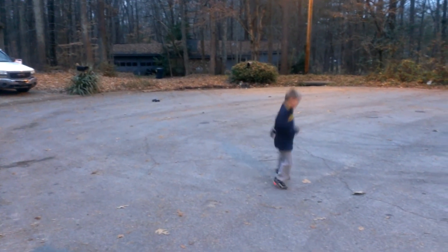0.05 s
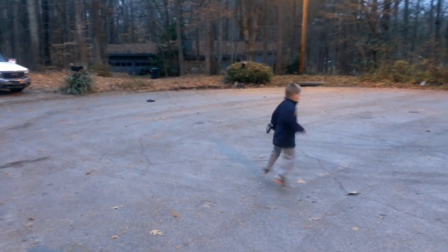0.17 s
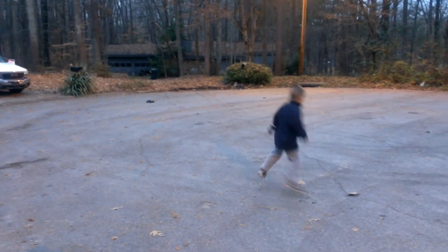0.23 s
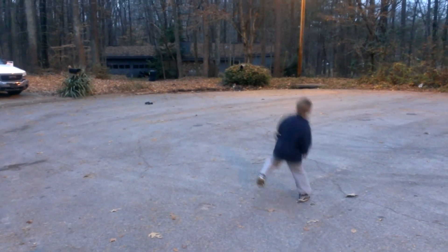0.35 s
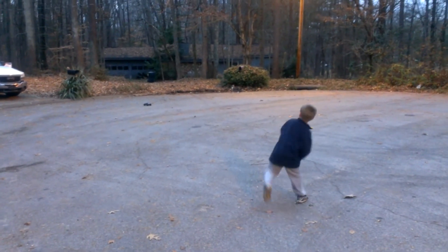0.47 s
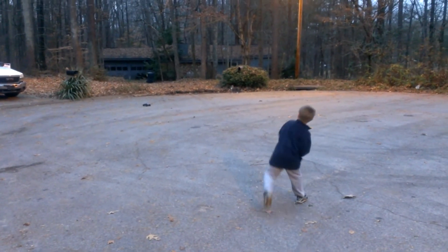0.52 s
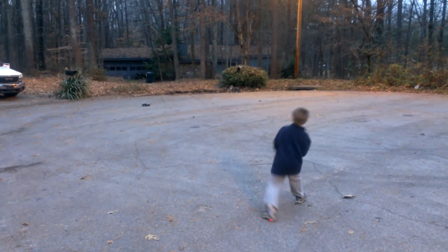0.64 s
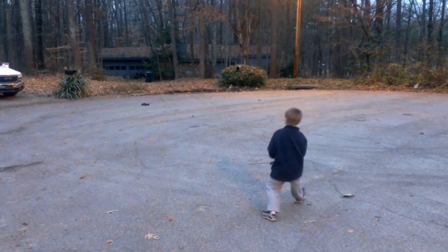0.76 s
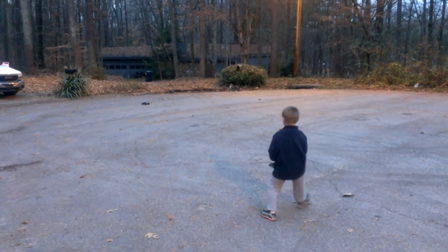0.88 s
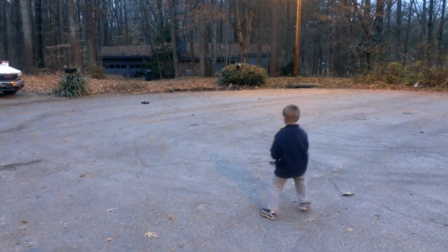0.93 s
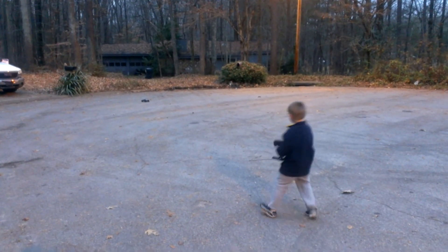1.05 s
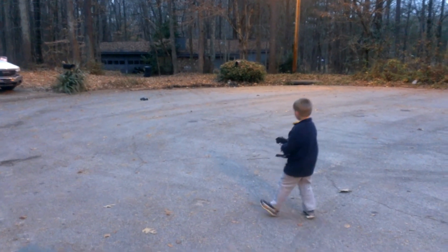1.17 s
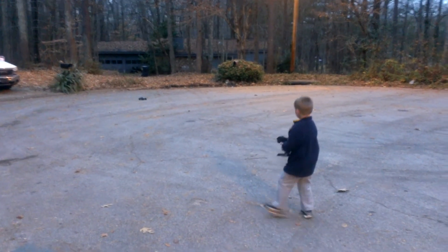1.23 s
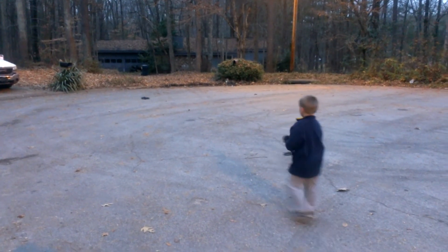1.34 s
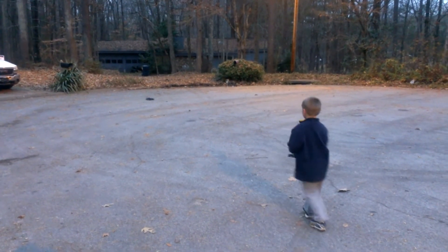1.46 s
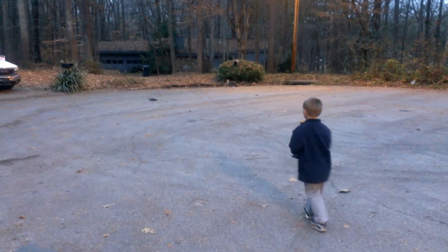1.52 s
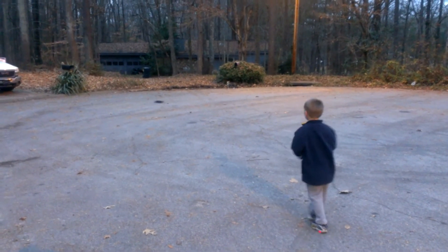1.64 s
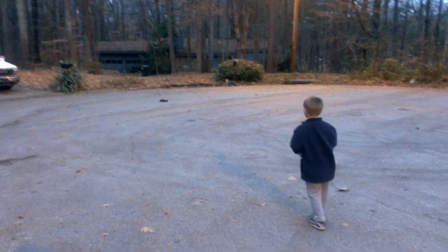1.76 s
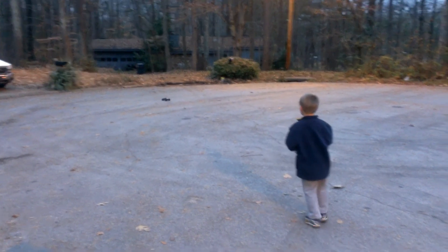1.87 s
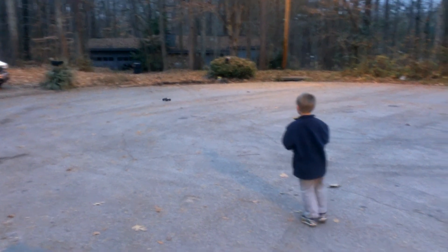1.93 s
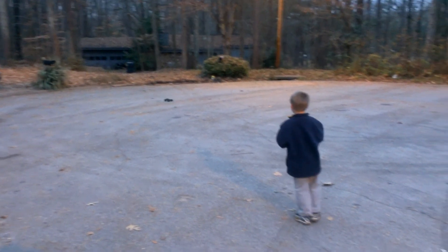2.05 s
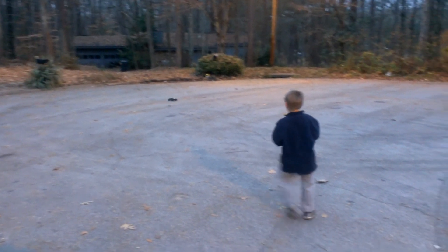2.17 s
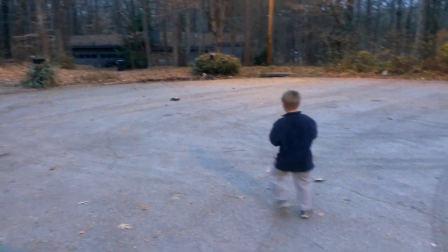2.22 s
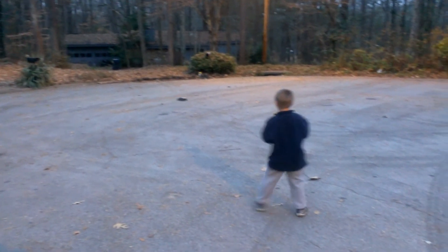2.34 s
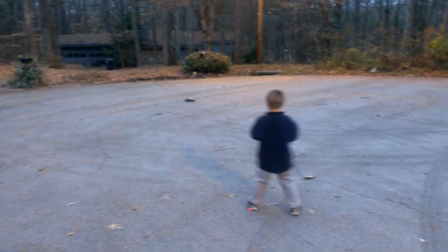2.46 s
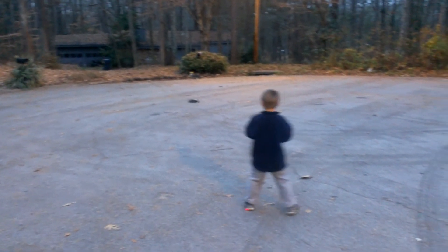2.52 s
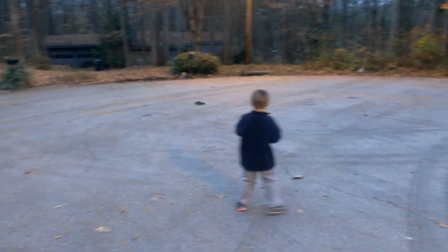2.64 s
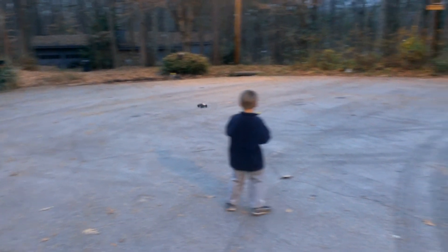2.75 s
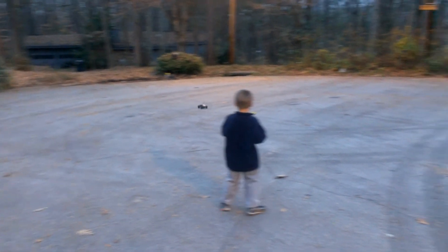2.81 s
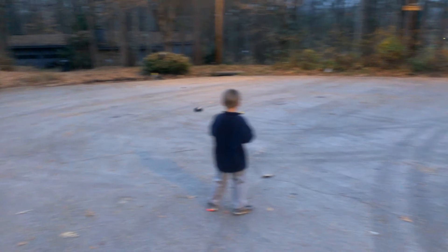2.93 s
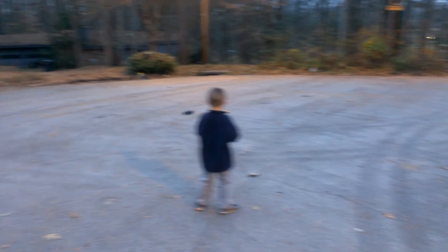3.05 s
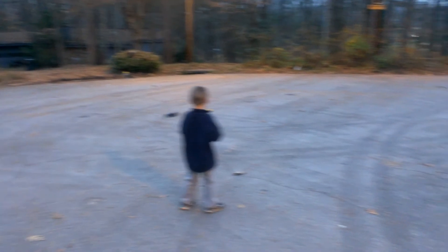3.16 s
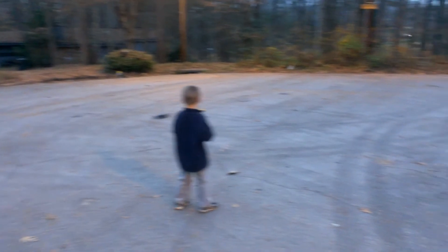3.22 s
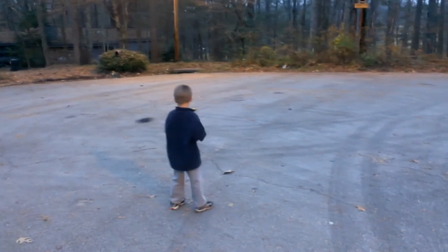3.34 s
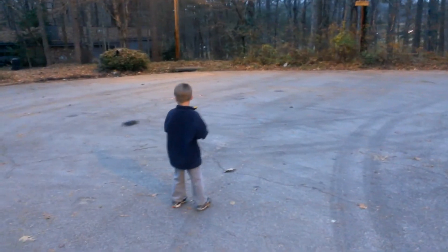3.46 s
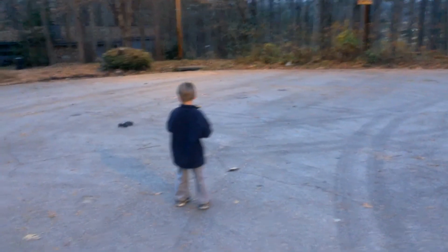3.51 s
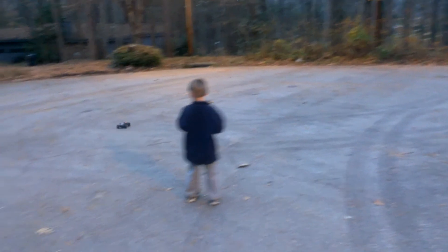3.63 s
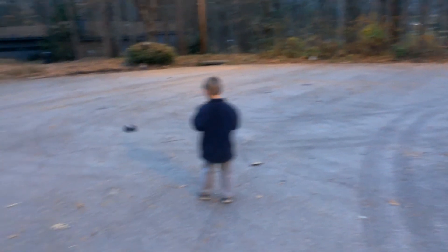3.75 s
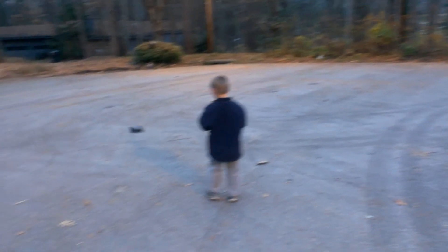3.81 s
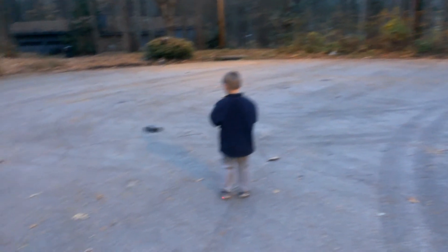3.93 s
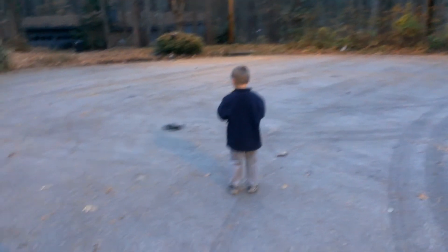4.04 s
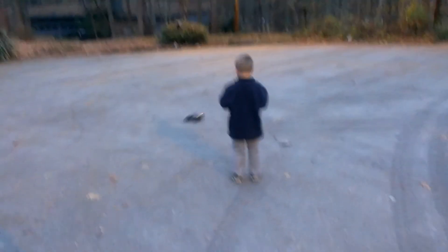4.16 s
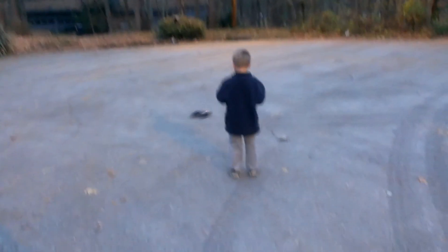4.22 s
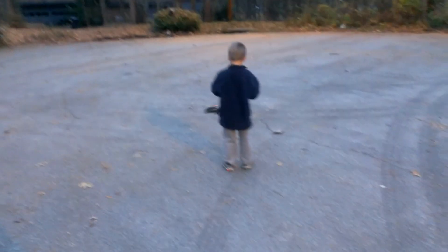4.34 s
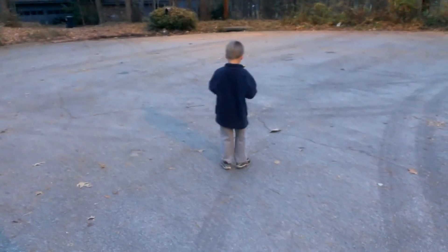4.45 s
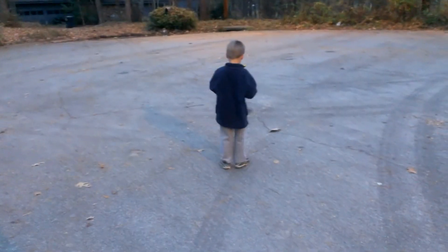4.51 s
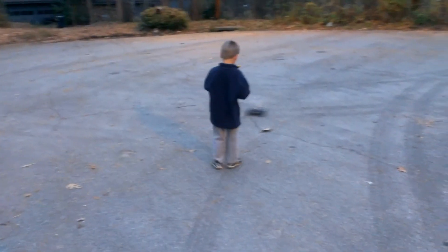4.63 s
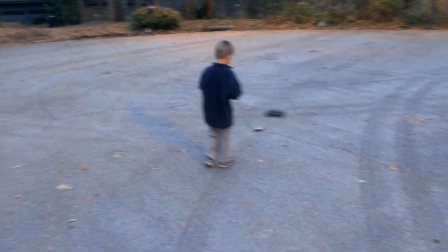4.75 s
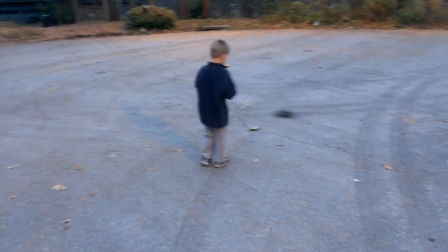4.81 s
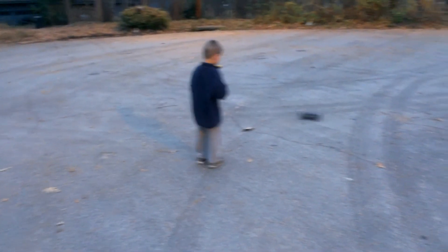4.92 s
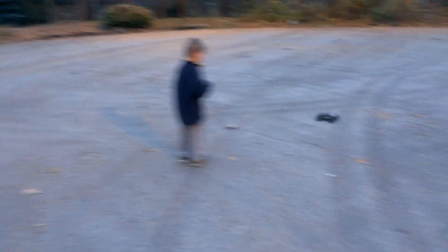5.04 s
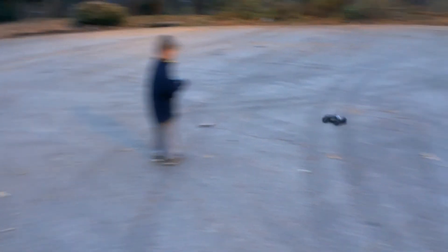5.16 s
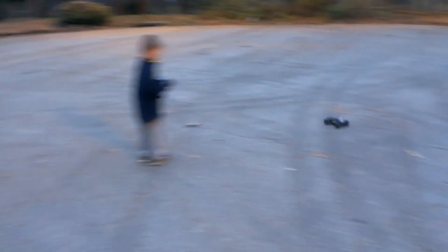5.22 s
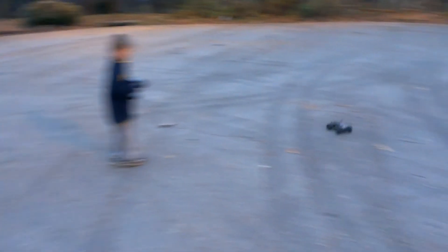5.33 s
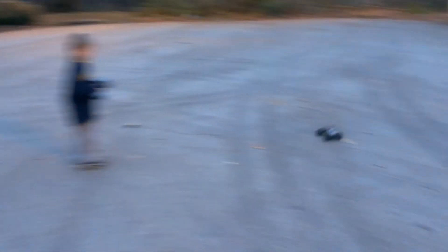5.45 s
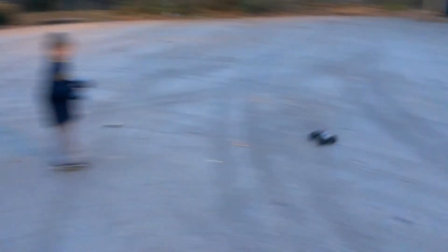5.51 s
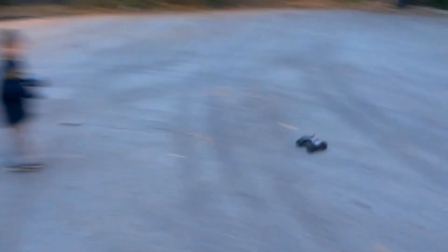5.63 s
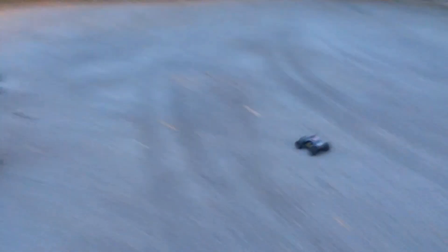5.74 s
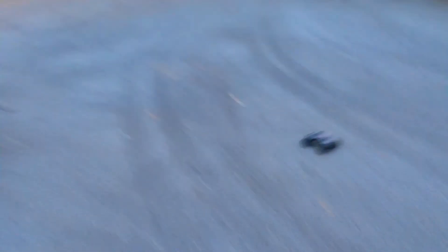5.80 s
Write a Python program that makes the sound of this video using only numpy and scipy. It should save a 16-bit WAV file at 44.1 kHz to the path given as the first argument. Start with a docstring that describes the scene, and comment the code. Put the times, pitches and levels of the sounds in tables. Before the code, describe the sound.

Quick gritty footsteps and a jacket rustle give way to an electric toy truck's buzzing gears and rolling chatter, swelling as it approaches.

```python
"""A small electric toy truck starts far off on asphalt, curves round and comes close. The grinding of its motor
and tyres is shaken noise, coloured by the resonances of its plastic shell; its gears whine as blurred tones. A
child's shoes scuff nearby (noise scrapes over dull thuds, and a knock and a crack ring like ticks), a jacket-
like rustle is narrow grainy noise, and grit ticks with short rings. Distant traffic murmurs as shaped noise; a
low hum of wavering pitch swells as the truck comes near."""
import sys
import numpy as np
from scipy import signal
from scipy.fft import rfft, irfft, next_fast_len
from scipy.io import wavfile
from scipy.ndimage import uniform_filter1d, map_coordinates

SR = 44100
rng = np.random.default_rng(int(sys.argv[2]) if len(sys.argv) > 2 else 0)


def transcribe(signal):
    """Save signal, clipped to [-1, 1], as a 16-bit WAV file at the path in sys.argv[1]."""
    frames = np.atleast_2d(signal).T
    limited = np.clip(frames, -1, 1)
    pcm = np.round(limited * 32767).astype(np.int16)
    wavfile.write(sys.argv[1], SR, pcm)


N = 259308
FRAME, HOP = 512, 128  # short-time spectra: frame length and step [samples]

# How loud the truck is before its jolts: (time [s], level [dB])
TRUCK_LEVEL = [(1.12, -57), (1.4, -55.5), (1.75, -52.5), (1.98, -47.5), (2.13, -42.5), (2.55, -36),
               (2.8, -31.5), (2.95, -35), (3.2, -37), (3.3, -40), (3.42, -38.5), (3.65, -33), (3.95, -35),
               (4.19, -35), (4.29, -41), (4.38, -49.5), (4.5, -43.5), (4.7, -38.5), (4.98, -33),
               (5.45, -32.5), (5.67, -30), (5.88, -28)]
# How much sooner the truck reaches the left ear than the right: (time [s], lead [microseconds])
LEFT_LEAD = [(1.12, -6), (1.8, -18), (3, 8), (3.6, 3), (4.6, -11), (5, 73), (5.88, 57)]


def amp(db):
    """Gain of a level in dB."""
    return 10 ** (np.asarray(db) / 20)


def unit(x):
    """Scale x to an rms (average strength) of 1."""
    return x / np.sqrt(np.mean(np.abs(x) ** 2) + 1e-20)


def along(points, hz):
    """Read (Hz, value) points along a logarithmic frequency axis."""
    point_hz, values = np.transpose(points)
    return np.interp(np.log(hz + 1), np.log(point_hz + 1), values)


def curves(rows, t):
    """Read each column after the time at times t, with straight lines between rows."""
    s, *columns = np.transpose(rows)
    return [np.interp(t, s, column) for column in columns]


def during(rows, t, fade):
    """1 inside the time span of the rows, fading to 0 within fade seconds on either side."""
    inside = np.minimum(t - rows[0][0], rows[-1][0] - t)
    return np.clip(1 + inside / fade, 0, 1)


def wobble(rate):
    """A smooth random curve with rate random points a second."""
    coarse = np.arange(0, N + 16, 16)
    knots = rng.standard_normal(int(N * rate / SR) + 4)
    smooth = map_coordinates(knots, [coarse * rate / SR])
    return np.interp(np.arange(N), coarse, smooth)


def frames(x):
    """Split sound into frequencies (as a column), times and short-time spectra."""
    hz, t, z = signal.stft(x, SR, nperseg=FRAME, noverlap=FRAME - HOP)
    return hz[:, None], t, z


def sound(z):
    """Turn short-time spectra back into sound."""
    return signal.istft(z, SR, nperseg=FRAME, noverlap=FRAME - HOP)[1][..., :N]


def spread(z, alike):
    """Mix two unrelated spectra into left and right with the given likeness."""
    turn = np.arccos(np.clip(alike, -1, 1)) / 2
    shared, opposed = np.cos(turn) * z[0], np.sin(turn) * z[1]
    return np.array([shared + opposed, shared - opposed])


def passing(gain):
    """Scale a spectral shape so that white noise keeps its power in every frame."""
    return gain / np.sqrt(np.mean(gain ** 2, axis=0, keepdims=True))


def resonance(hz, centre_hz, width_hz):
    """A steep-sided spectral peak, like a part that rings around one pitch."""
    return passing(1 / (1 + ((hz - centre_hz) / width_hz) ** 2) ** 1.5)


def sides(pan_db):
    """Left and right gains for a left-right level difference."""
    return amp(np.array([pan_db / 2, -pan_db / 2]))[:, None]


def street():
    """Far traffic and air are shaped noise; beside them a low hum of wavering pitch swells as the truck comes
    near."""
    # Tone colour of the air: (frequency [Hz], relative level [dB per Hz])
    air_colour = [(25, -30), (76, -30), (110, -18), (184, -7), (330, -4), (480, -9.5), (620, -9),
                  (880, -1.5), (1250, -6.5), (1450, -16), (2800, -21), (8000, -26.5), (15800, -26.5)]
    # Likeness of left and right: (frequency [Hz], likeness [1 = same])
    air_alike = [(60, 0.64), (180, 0.92), (550, 0.92), (1650, 0.082), (4970, 0.05), (15000, 0.36)]
    # Hum before its waver: (time [s], level [dB])
    hum_level = [(0, -89), (.9, -88), (2.34, -75), (2.54, -75), (3.11, -68), (3.39, -74), (3.65, -64),
                 (4.52, -67.5), (5.36, -59.5), (5.7, -77)]
    air_db = -57.5  # before its slow drift
    hz, _, z = frames(rng.standard_normal((2, N)))
    air = sound(spread(z, along(air_alike, hz)) * passing(amp(along(air_colour, hz))))
    t = np.arange(N) / SR
    waver_db = 2.6 * wobble(15)
    hum_tone = np.sin(2 * np.pi * 103 * t + 1.3 * wobble(25))
    hum = amp(curves(hum_level, t)[0] + waver_db) * hum_tone
    drift_db = .8 * wobble(1.09)
    return amp(air_db + drift_db) * air + hum


def rustle():
    """A jacket-like rustle: grainy noise in one narrow band, left of centre; each rub swells, holds and fades."""
    # Rubs near the child: (start [s], length before the fade [s], level [dB], swell [s])
    rubs = [(-.1, .29, -75, .02), (.325, .07, -73, .015), (0.649, 0.092, -65.5, .015),
            (.815, 0.033, -67, .015), (0.857, 0.62, -54.5, 0.25)]
    fade_s = 0.017
    grain_db = 2.3 * wobble(60.35) + 1.3 * wobble(400)
    hz, t, z = frames(rng.standard_normal((2, N)) * amp(grain_db))
    level = 0
    for s, length, db, swell in rubs:
        rise = np.clip((t - s) / swell, 0, 1)
        fall = np.exp(-np.maximum(t - s - length, 0) / fade_s)
        level = level + amp(db) * rise * fall
    return sound(spread(z, 0.68) * level * resonance(hz, 5210, 450) * sides(5 + 0 * t))


def shoes():
    """Each scuff is a gritty noise scrape of the sole over a short dull thud."""
    # Scuffs: (time [s], relative scrape level [dB], thud pitch [Hz], relative thud level [dB], length [s])
    scuffs = [(0.33, -50, 866, -47, 0.01), (0.6485, -59, 450, -39.5, 0.012), (0.6776, -45, 843, -49, 0.037),
              (0.7194, -39, 369, -42.5, 0.021), (0.8735, -33, 541, -36, 0.033),
              (0.888, -29, 534, -37, 0.017), (0.906, -36, 760, -42.5, 0.019),
              (1.0427, -28, 838, -37.5, 0.019), (1.0568, -24.5, 802, -34, 0.017),
              (1.425, -44, 950, -43, 0.033), (1.844, -34, 830, -63, 0.0078), (1.883, -34, 894, -45, 0.01)]
    # Tone colour of the scrape: (frequency [Hz], relative level [dB per Hz])
    sole_colour = [(710, -20), (1200, -37), (2620, -3.5), (3010, -18), (3450, -3.5), (4450, -20),
                   (5100, -1), (7310, -26), (15000, -35)]
    scrape, thud, t = np.zeros(N), np.zeros(N), np.arange(SR // 8) / SR
    for s, db, thud_hz, thud_db, length in scuffs:
        start = round(s * SR)
        stroke = (1 - np.exp(-t / 0.00039)) * np.exp(-(t / length) ** 1.3)
        noise = rng.standard_normal((2, len(t)))
        rough = amp(3 * unit(uniform_filter1d(noise[1], size=70)))
        scrape[start:][:len(t)] += amp(db - 18.5) * stroke * rough * noise[0]
        pitch_waver = 1.21 * unit(uniform_filter1d(noise[0], size=150))
        knock = np.sin(2 * np.pi * thud_hz * t + pitch_waver)
        thud[start:][:len(t)] += amp(thud_db - 3.5) * stroke * np.sqrt(rough) * knock
    hz, _, z = frames(scrape)
    # the scrape leans left by 3 dB, the thud sits in the middle
    return thud + sound(z * passing(amp(along(sole_colour, hz)))) * amp([[1.5], [-1.5]])


def loudness(t):
    """The truck's level in dB, jumping or dipping for a moment over rough asphalt."""
    # Jolts: (time [s], level change [dB])
    jolts = [(1.606, 0), (2.119, 3.5), (2.565, -0.5), (2.776, 2.5), (2.797, -4), (2.82, 1), (2.848, -2),
             (2.907, -3), (3.016, -5.5), (3.062, -5), (3.207, 2.5), (3.241, -7.5), (3.374, -7.5),
             (3.733, -7.5), (3.79, -3.5), (3.81, 2), (3.843, -5), (4.306, -6), (4.475, 2), (4.5, 2),
             (4.538, -4), (4.588, 0), (4.983, 2.5), (5.358, -1), (5.565, -1.5), (5.75, -2)]
    half_length_s = 0.013
    jolt_db = sum(db * np.exp(-((t - s) / half_length_s) ** 2) for s, db in jolts)
    return curves(TRUCK_LEVEL, t)[0] + jolt_db


def wheels(depth_db):
    """Level swing in dB of out-of-round wheels: once a turn, unevenly."""
    # Wheel speed: (time [s], turns a second [Hz])
    wheel_speed = [(1.1, 12), (2.8, 20), (3.6, 16), (4.4, 14), (5.2, 17), (5.88, 21)]
    turns = np.cumsum(curves(wheel_speed, np.arange(N) / SR)[0]) / SR
    depth = depth_db * (1 + .5 * wobble(5.07))
    return depth * np.sin(2 * np.pi * turns + 1.46 * wobble(4))


def grinding(bump_db):
    """Tooth and tyre chatter: noise shaken by the wheels and the road, with fine grains of grit in it."""
    grains = (rng.random(N) < 900 / SR) * rng.exponential(1.6, N)  # about 900 a second
    shake = amp(wheels(0.88) + bump_db * wobble(30) + 0.91 * wobble(120))
    return unit(shake * (1 + grains) * rng.standard_normal((2, N)))


def truck():
    """The chatter sounds through the shell's resonances, which shift and change strength as the truck turns."""
    # Resonances: (time [s], tub [Hz], deck [Hz], cab [Hz], gearbox [Hz], motor can [Hz])
    centres = [(1.12, 880, 1880, 2830, 4030, 5100), (1.42, 960, 1950, 2930, 3870, 5050),
               (1.5, 1030, 2130, 3140, 3800, 4700), (1.8, 1050, 2100, 3150, 3830, 4770),
               (1.88, 1070, 1890, 3100, 3880, 4770), (2.1, 925, 2200, 3100, 3860, 4800),
               (2.8, 960, 2120, 2920, 3880, 4990), (3.45, 980, 2200, 3300, 4340, 5230),
               (3.65, 950, 2210, 3150, 4400, 5650), (4.17, 1060, 2164, 3450, 4000, 4760),
               (4.63, 1066, 2450, 3450, 3500, 5200), (4.87, 1090, 2400, 3630, 4000, 5330),
               (4.97, 970, 2250, 3420, 4100, 5260), (5.2, 1050, 2435, 3280, 4700, 4860),
               (5.55, 985, 2600, 3170, 4200, 5080), (5.88, 910, 2790, 3170, 4540, 5340)]
    # Half widths of those five at the middle level: one column (half width [Hz])
    half_widths = [268, 210, 350, 513, 650]
    # Side towards the listener, and levels against the truck's: (time [s], side [0 gearbox to 1 motor],
    # deck [dB], cab [dB], brush hiss [dB], motor can left-right difference [dB])
    heading = [(1.12, 0.18, -8.5, -14, -9, -2), (1.4, 0.43, -10, -16, -12, 1),
               (1.65, 0.15, -9.5, -19, -24, 6), (1.8, 0, -8, -15, -18, 17), (1.88, 0, -6, -13.5, -11, 24),
               (2.1, 0.081, -8, -13, -20, 10), (2.42, 0, -8, -12.5, -14, 14),
               (2.85, 0.23, -13, -14, -16.5, 1), (3.08, 0.21, -12.5, -10, -16.5, 4),
               (3.25, 0.32, -4, -15.5, -17.5, 6), (3.52, 0.2, -6, -9, -17, 16.5),
               (3.72, 0.042, -2.5, -12.5, -19, 2), (3.88, 0.17, -15.5, -10, -18.5, 8),
               (4.18, 0.6, -6.5, -8.5, -16, 8.5), (4.36, 0.48, -22, -7.5, -14, 5),
               (4.46, .75, -13, -15, -18, 6), (4.57, 0.36, -14, -18, -25, 2),
               (4.65, 0.88, -20, -9.5, -18, 7.5), (4.85, 0.73, -13, -11.5, -21.5, 6),
               (5.1, 0.85, -10, -10.5, -14.5, 7), (5.5, 1, -10.5, -11, -14, 7),
               (5.75, 1, -7.5, -11, -18.5, 12.5), (5.88, 0.86, -9.5, -12.5, -17, 8)]
    # Which way the gearbox leans: (time [s], left-right difference [dB])
    gearbox_side = [(1.12, 1), (1.62, 5.5), (2.19, 3.5), (2.91, 1), (3.51, 14), (3.69, 11), (3.9, 5.5),
                    (4.41, 4), (4.9, 4), (5.08, 15), (5.3, 0), (5.88, 5)]
    # Load bed, ringing broadly when it faces the listener: (time [s], level against the truck's [dB])
    bed_level = [(1.12, -36), (2.15, -30), (2.5, -14.5), (3, -38), (4.3, -19), (4.46, -13.5), (4.6, -9),
                 (4.72, -18.5), (4.95, -18.5), (5.3, -12.5), (5.88, -7.5)]
    # Tone colour of the rolling rumble: (frequency [Hz], relative level [dB per Hz])
    roll_colour = [(65, -39), (110, -6), (134, -7), (301, 6.5), (478, -1.5), (600, -29), (780, -27),
                   (1320, -120)]
    # Tone colour of the brush hiss: (frequency [Hz], relative level [dB per Hz])
    hiss_colour = [(3530, -25), (6000, 2.5), (6230, -7.5), (6580, -5.5), (6950, -5.5), (8430, -3.5),
                   (9530, -11.5), (10500, -11), (11500, -17), (15000, -56), (22000, -120)]
    # Likeness of left and right: (frequency [Hz], likeness [1 = same])
    truck_alike = [(60, 1), (1000, 0.88), (3000, 0.77), (4500, 0.93), (6000, 0.14), (9000, 0.35),
                   (15000, 0.41)]
    # parts: dB from the truck's level on the gearbox side, on the motor side, growth in dB per dB of that level
    tub, gearbox, can = (-10.5, -5.5, 0.72), (-3.5, -21.5, 1.14), (-12.5, -4.5, 1.27)
    roll, tyres = (-20.5, -18, 0.57), (-35, -22, 0.38)
    middle_db = -38  # growth is counted from this level
    widen = 0.085  # the resonances widen by this many dB per dB of the truck's level

    hz, t, z = frames(grinding(bump_db=0.5))
    patches = rng.standard_normal(z.shape[1:])
    patches = uniform_filter1d(uniform_filter1d(patches, size=2, axis=0), size=30, axis=1)
    side, deck_db, cab_db, brush_db, can_lean = curves(heading, t)
    over = curves(TRUCK_LEVEL, t)[0] - middle_db

    def part(gearbox_db, motor_db, growth):
        """Level of a part for the side it shows and how loud the truck is."""
        return gearbox_db + (motor_db - gearbox_db) * side + (growth - 1) * over

    centred = 0 * t
    bright_lean = part(0.2, -2.5, 0.9)  # left-right dB of hiss and tyres
    strengths = [part(*tub), deck_db, cab_db, part(*gearbox), part(*can)]
    leans = [centred, centred, centred, *curves(gearbox_side, t), can_lean]
    # the parts add up as powers
    shell = 0
    for db, centre, width, lean_db in zip(strengths, curves(centres, t), half_widths, leans):
        peak = resonance(hz, centre, width * amp(widen * over))
        shell = shell + (amp(db) * peak * sides(lean_db)) ** 2
    shell = shell + (amp(curves(bed_level, t)[0]) * resonance(hz, 1703, 350) * sides(centred)) ** 2
    shell = shell + (amp(part(*roll)) * passing(amp(along(roll_colour, hz)))) ** 2
    shell = shell + (amp(brush_db) * passing(amp(along(hiss_colour, hz))) * sides(bright_lean)) ** 2
    shell = shell + (amp(part(*tyres)) * resonance(hz, 13250, 2200) * sides(bright_lean)) ** 2

    alike = np.clip(along(truck_alike, hz), 0, 1)
    # half of the left lead goes on each side; it is lost in the treble
    lead_hz = hz / (1 + (hz / 6000) ** 4)
    lead = np.exp(1j * np.pi * lead_hz * curves(LEFT_LEAD, t)[0] / 10 ** 6)
    heard = spread(z, alike) * [lead, lead.conj()] * amp(2 * unit(patches)) * np.sqrt(shell)
    return sound(heard * during(TRUCK_LEVEL, t, 0.48) * amp(loudness(t)))


def grit():
    """Each tick is a bright snap and a brief rough ring that sags in pitch."""
    # Ticks: (time [s], relative ring level [dB], nominal ring pitch [Hz], ring length [s], relative snap level
    # [dB], left-right difference [dB]); the first two rows are a knock and a crack of the shoes, played the
    # same way
    ticks = [(0.723, -26.5, 1470, 0.0017, -63, -6), (0.65, -47, 1970, 0.0012, -62, 0),
             (1.045, -42, 3540, 0.0025, -50, 16), (1.883, -35.5, 4040, 0.0039, -45, 5),
             (1.938, -46, 8500, .001, -41, -14), (1.981, -41, 8400, 0.0008, -47, -13),
             (2.403, -37, 6300, 0.0024, -55, 3), (4.1656, -18, 4680, 0.0066, -34, 4),
             (4.23, -20.5, 5040, 0.0029, -29, 5), (4.71, -40, 8400, 0.0014, -46, -7),
             (4.75, -46, 7900, 0.0016, -37, -8)]
    out, t = np.zeros((2, N)), np.arange(SR // 40) / SR
    for s, db, ring_hz, length, bright_db, pan in ticks:
        noise = rng.standard_normal((2, len(t)))
        rough = .7 * unit(uniform_filter1d(noise[0], size=24))
        sagging_phase = 2 * np.pi * ring_hz * t * (1.08 - 15 * t)
        ring = np.sin(sagging_phase + rough) * np.exp(-(t / length) ** 4)
        snap = unit(uniform_filter1d(noise[1], size=8)) * np.sin(2 * np.pi * 7800 * t)
        snap = snap * amp(-60 * t / 0.011)  # falls 60 dB in 11 ms
        onset = 1 - np.exp(-t / 0.00097)
        tick = (amp(db + 1.0) * ring + amp(bright_db) * snap) * onset
        out[:, round(s * SR):][:, :len(t)] += sides(pan) * tick
    return out


def gears():
    """The tooth rate and its double: tones blurred by loose teeth, beating with the wheels."""
    # Stretches of gear whine: (level of the doubled tone at start and end [dB], blur at start and end [0-1],
    # rows of (time [s], tooth rate [Hz], level [dB])); levels are relative to the truck's
    mesh = [((-15, -9), (.8, .8), [(.92, 950, -26), (1.4, 987, -31), (1.46, 1010, -4)]), ((-28, -9),
            (0.45, 0.58), [(1.55, 878, -4), (1.65, 928, 0), (1.8, 1008, -5.5), (1.92, 1085, -22)]),
            ((-23, -26), (0.61, 0.62), [(2.05, 741, -16), (2.2, 827, -4), (2.36, 866.3, -4.5),
            (2.48, 883.7, -3.5), (2.79, 944, -5), (2.98, 928, -5.5), (3.2, 833, -10.5), (3.38, 761, -8)]),
            ((-32, -29), (1, 0.44), [(4.44, 1000, -2), (4.6, 1042, 1), (4.72, 1121, -18),
            (4.9, 1339, -9.5)]), ((-15, -7), (1, 0.43), [(4.92, 757, -16), (5.1, 800, -11.5),
            (5.3, 798.4, -12), (5.55, 807.6, -8), (5.65, 830, -12), (5.72, 857, -2.5), (5.88, 868.5, -2)])]
    whole, out = np.arange(N) / SR, np.zeros((2, N))
    swing = unit(amp(wheels(3.5))) * amp(loudness(whole) + 3)
    loose = [unit(wobble(rate) + 1j * wobble(rate)) for rate in (115, 210)]
    for second_db, blur_ends, rows in mesh:
        fade = during(rows, whole, .06)
        on = fade > 0
        t = whole[on]
        rate, first_db = curves(rows, t)
        lead = np.pi * curves(LEFT_LEAD, t)[0] / 10 ** 6 * np.array([[1], [-1]])
        phase = 2 * np.pi * np.cumsum(rate) / SR + lead * rate
        blur = np.clip(np.linspace(*blur_ends, len(t)), 0, 1)
        pinion = 1 + .4 * np.sin(phase / 18)  # an off-centre gear of 18 teeth beats once a turn
        for k, db in enumerate([first_db, np.linspace(*second_db, len(t))]):
            blurred = np.sqrt(1 - blur) + np.sqrt(blur) * loose[k][on]
            tone = blurred * np.exp(1j * (k + 1) * phase)
            out[:, on] += (fade * swing)[on] * amp(db) * pinion * tone.real
    return out


def scene():
    """All sources together in the open air."""
    return truck() + gears() + rustle() + shoes() + grit() + street()


def record(dry):
    """The microphone rolls off the deep bass and adds a faint rumble of its own; the top is cut off."""
    top_hz = 15760  # nothing stays above this
    m = next_fast_len(N + SR // 4)
    hz = np.fft.rfftfreq(m, 1 / SR)
    bass = 1 / (1 + (85 / (hz + 1)) ** 8)
    # one noise shared by both sides plus a weaker one for each
    noise = rng.standard_normal(N) + 0.43 * rng.standard_normal((2, N))
    rumble = amp(-64) * rfft(noise, m) * (1 - bass)
    return irfft((rfft(dry, m) * bass + rumble) * (hz < top_hz), m)[:, :N]


dry = scene()
out = record(dry)
transcribe(out)
```